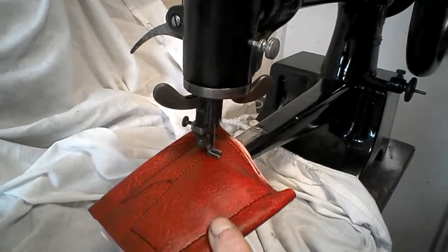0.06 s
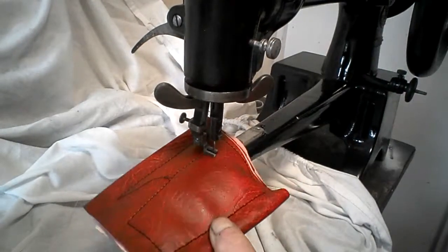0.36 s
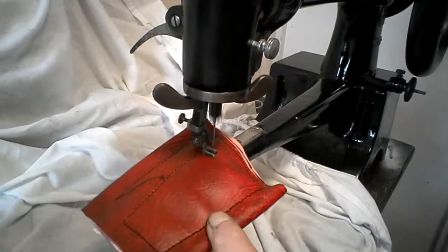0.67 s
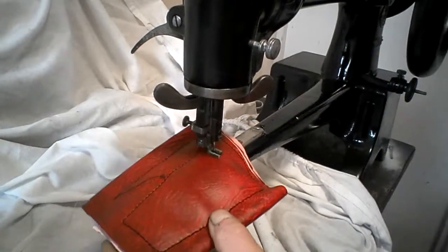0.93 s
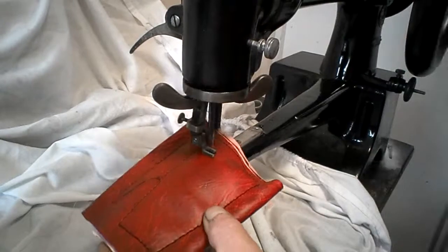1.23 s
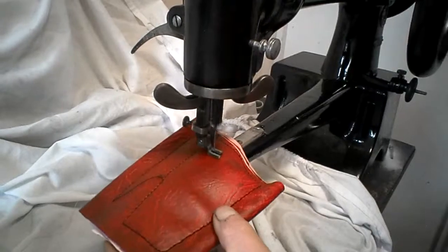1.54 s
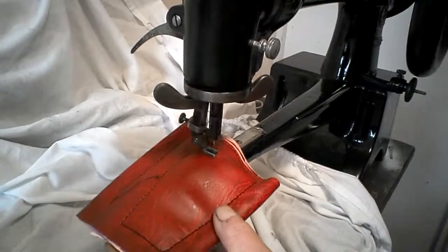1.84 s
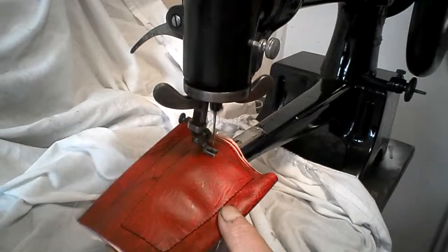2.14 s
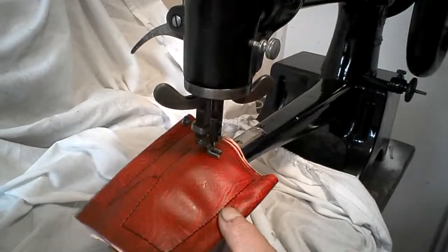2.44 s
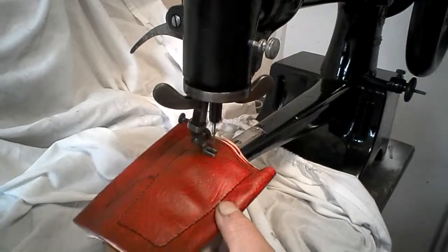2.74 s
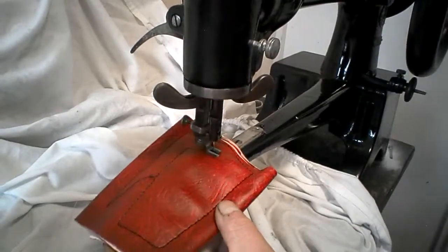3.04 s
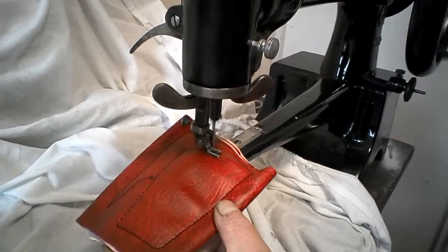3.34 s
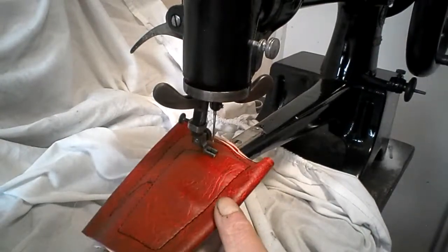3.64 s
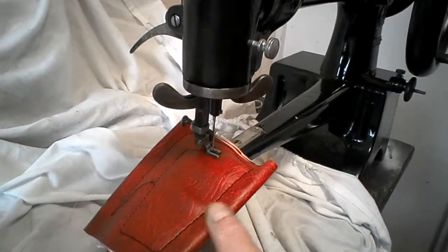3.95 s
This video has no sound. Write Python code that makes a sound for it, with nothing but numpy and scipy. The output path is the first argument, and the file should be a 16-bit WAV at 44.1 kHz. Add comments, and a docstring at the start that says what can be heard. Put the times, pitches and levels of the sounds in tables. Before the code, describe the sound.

A sewing machine clacks steadily through leather, then slows and stops.

```python
"""Leather sewing machine

Close by in a quiet room, the machine makes two stitches a second, then slows and stops.
Each stitch is the same round of steel contacts (needle, feed, shuttle, presser foot), which ring
the iron frame and its table. The drive thumps and rumbles underneath; a faint hiss remains."""
import sys
import numpy as np
from scipy import signal
from scipy.fft import rfft, irfft
from scipy.io import wavfile
from scipy.ndimage import uniform_filter1d

SR = 44100
rng = np.random.default_rng(int(sys.argv[2]) if len(sys.argv) > 2 else 0)


def int16_out(signal):
    """Quantize to a 16-bit WAV file."""
    q = np.round(np.clip(np.atleast_2d(signal).T, -1, 1) * 32767)
    wavfile.write(sys.argv[1], SR, q.astype(np.int16))


N = 176400
T = np.arange(N) / SR
RING_SAMPLES = 17000
AGE = T[:RING_SAMPLES]  # seconds since a blow
BAND_EDGES_HZ = np.geomspace(18, 17000, 33)
BAND_HZ = np.sqrt(BAND_EDGES_HZ[1:] * BAND_EDGES_HZ[:-1])


def amp(db):
    """Turn decibels into a gain."""
    return 10 ** (np.asarray(db) / 20)


def at_hz(table, hz, column=1):
    """Read a table at any pitch, blending between its rows."""
    rows = np.array(table)
    return np.interp(np.log(hz), np.log(rows[:, 0]), rows[:, column])


def level(table):
    """Gain over time from rows of time_s, level_db."""
    return amp(np.interp(T, *np.transpose(table)))


def add(out, start_s, sound):
    """Mix a sound in at its start time."""
    i = int(np.clip(start_s * SR, 0, N - 1))
    out[i:i + len(sound)] += sound[:N - i]


def noise_bands():
    """Separate bands of noise from low to high, all equally strong."""
    filters = [signal.butter(2, edges, "band", fs=SR, output="sos")
               for edges in zip(BAND_EDGES_HZ, BAND_EDGES_HZ[1:])]
    bands = np.array([signal.sosfilt(sos, rng.standard_normal(N + RING_SAMPLES))[RING_SAMPLES:]
                      for sos in filters])
    return bands / bands.std(axis=1, keepdims=True)


def band_gains(tone):
    """Gain of each band. A tone table sets the balance of low and high, not the loudness."""
    gains = amp(at_hz(tone, BAND_HZ)) * np.sqrt(BAND_HZ)
    return gains / np.linalg.norm(gains)


def piece(bands):
    """A random stretch of the bands, as long as one ring."""
    i = rng.integers(N - RING_SAMPLES)
    return bands[:, i:i + RING_SAMPLES]


def steady_noise(tone):
    """Noise with the given tone and a power of 1."""
    hz = np.maximum(np.arange(N // 2 + 1) * SR / N, 1)
    noise = irfft(rfft(rng.standard_normal(N)) * amp(at_hz(tone, hz)), N)
    return noise / noise.std()


# Tone of the hiss both ears share, and of the part that sets them apart: pitch_hz, level_db
HISS_TONE = [(100, 7), (300, -12), (700, -15), (1600, -5), (3000, -6), (4900, 1), (5400, 8), (5900, -1),
             (6350, 6), (7100, 0.5), (7700, -6), (8500, 4), (9300, -4.5), (10300, -8), (11400, 4.5),
             (12500, -1), (14000, -8), (16000, -6)]
HISS_SIDE_TONE = [(60, 2), (150, 3), (500, 4), (1500, -0.5), (4500, 0.5), (8000, 13), (15000, 14)]

def hiss(shared_db=-71, side_db=-78.5):
    """A faint steady hiss, slightly different left and right."""
    shared = amp(shared_db) * steady_noise(HISS_TONE)
    return shared + amp(side_db) * steady_noise(HISS_SIDE_TONE) * [[1], [-1]]


# Shaking of the stand: time_s, level_db
RUMBLE = [(0, -82), (.6, -65), (1.5, -77.5), (2.3, -61), (2.8, -70), (3.4, -61), (3.8, -68), (4, -90)]
# Its tone: pitch_hz, level_db
RUMBLE_TONE = [(20, 9.5), (29, 16), (42, -14), (60, -20.5), (120, -30.5), (400, -78)]

def stand_rumble(bands):
    """The stand shakes with a deep rumble."""
    return level(RUMBLE) * (band_gains(RUMBLE_TONE) @ bands)


# Noise of the sliding parts: time_s, level_db
SLIDING = [(0, -55), (.5, -51.5), (1.5, -52.5), (2.5, -52.5), (2.9, -55), (3.15, -58), (3.4, -62.5),
           (3.6, -75), (3.8, -77.5), (4, -77.5)]
# Its tone: pitch_hz, level_db
SLIDING_TONE = [(60, 0), (110, -1), (160, 4.5), (210, -3.5), (290, 2), (500, -8.5), (900, -10),
                (2500, -23.5), (4800, -15), (7000, -36), (15000, -38)]

def sliding_parts(bands, peak_rattles_per_s=110, rattle_db=5, rattle_s=0.0039):
    """Bearings and slides murmur and rattle while the wheel turns."""
    effort = level(SLIDING)
    chance = peak_rattles_per_s / SR * effort / effort.max()
    clicks = (rng.random(N) < chance) * amp(rattle_db) * rng.random(N)
    bursts = signal.lfilter([1], [1, -np.exp(-1 / (rattle_s * SR))], clicks + 1e-18)
    murmur = band_gains(SLIDING_TONE) @ bands
    steel = (band_gains(SHUTTLE_TONE) @ bands)[::-1]  # backwards, so unrelated to the murmur
    return effort * (murmur + bursts * steel)


# Thumps of the drive: start_s, thud_db, boom_db
THUMPS = [(.002, -49, -53.5), (0.269, -57, -71), (.508, -49.5, -56), (1.007, -49.5, -59),
          (1.164, -55.5, -66), (1.481, -76, -52), (1.673, -53.5, -69), (2.006, -45, -46.5),
          (2.522, -44.5, -49), (2.765, -56.5, -53), (3.139, -51.5, -50.5), (3.323, -48, -51),
          (3.548, -74, -66), (3.689, -66, -66)]
# Tone of the thud: pitch_hz, level_db
THUD_TONE = [(60, -5), (150, 0.5), (215, -4.5), (300, 0.5), (400, 3), (490, -1), (650, -11), (1200, -20.5),
             (4000, -50)]
THUD_RISE_S, THUD_FALL_S = 0.0022, 0.028
BOOM_HZ, BOOM_PEAK_S, OVERTONE_HZ, OVERTONE_DB = 77, 0.067, 155.2, -14

def drive_thumps(bands):
    """The drive thuds dully; after each thud, two low notes of the room swell and sink."""
    thud_shape = 2 * (1 - np.exp(-AGE / THUD_RISE_S)) * np.exp(-AGE / THUD_FALL_S)
    notes = np.sin(2 * np.pi * BOOM_HZ * AGE) + amp(OVERTONE_DB) * np.sin(2 * np.pi * OVERTONE_HZ * AGE)
    boom = (AGE / BOOM_PEAK_S * np.exp(1 - AGE / BOOM_PEAK_S)) ** 2 * notes
    out = np.zeros(N)
    for start_s, thud_db, boom_db in THUMPS:
        thud = thud_shape * (band_gains(THUD_TONE) @ piece(bands))
        add(out, start_s, amp(thud_db) * thud + amp(boom_db) * boom)
    return out


# The machine's blurred ring after a blow: pitch_hz, level_db, fade_s (time to drop 60 dB), build_s
TAIL = [(150, -11.5, 0.44, 0.042), (495, -12.5, 0.28, 0.02), (1110, -9.5, .26, 0.0015),
        (2450, -9.5, 0.33, 0.0014), (4660, -11.5, 0.23, 0.0012), (8100, -10.5, 0.28, 0.0025),
        (15000, -13, 0.14, .001)]
# Clear notes of the frame and table: pitch_hz, level_db, fade_s
FRAME_NOTES = [(257.5, -12, 0.52), (395.7, -13, 0.21), (461, -17, 0.51), (501.5, -9, 0.23),
               (625, -23.5, 0.22), (700, -17, 0.43), (909, -15.5, 0.34), (1000, -17.5, 0.23),
               (1148, -14, 0.11), (1364, -16, 0.061), (1894, -8, 0.11), (2070, -7, 0.13),
               (2420, -15.5, 0.26), (2500, -13, 0.17), (2790, -9.5, 0.13), (3040, -18, 0.16),
               (3840, -23, 0.061), (3990, -19, 0.066), (4630, -7.5, 0.16), (4770, -10, 0.27),
               (5260, -6, 0.09)]
SAME_SHARE, SAME_ABOVE_HZ = 0.92, 1500  # high noise mostly repeats from blow to blow; low noise varies
NOTE_SPREAD_DB, NOTE_WANDER = 5.5, 0.0081  # the notes shift as the parts move
LONGEST_RING_CYCLES = 750

def steel_blows(bands, hits, tone, gain_db, rise_s, crack_s, tail_db, notes_db):
    """Steel hits steel: a sharp crack, a blurred ringing tail and the frame's clear notes."""
    band_db, fade_s, build_s = (at_hz(TAIL, BAND_HZ, column)[:, None] for column in (1, 2, 3))
    crack = (1 - np.exp(-AGE / rise_s)) * np.exp(-AGE / crack_s) * (1 - np.exp(-crack_s / build_s))
    tail = amp(band_db + tail_db - 60 * AGE / fade_s) * (1 - np.exp(-AGE / build_s))
    shape = band_gains(tone)[:, None] * np.hypot(crack, tail)
    share = SAME_SHARE / (1 + (SAME_ABOVE_HZ / BAND_HZ[:, None]) ** 2)
    same_noise = (np.sqrt(share) * shape * piece(bands)).sum(axis=0)
    fresh_shape = np.sqrt(1 - share) * shape

    hz, note_db, note_fade_s = np.transpose(FRAME_NOTES)[:, :, None]
    note_fade_s = np.minimum(note_fade_s, LONGEST_RING_CYCLES / hz)
    note_shapes = amp(note_db + notes_db + at_hz(tone, hz) - 60 * AGE / note_fade_s)
    note_shapes *= 1 - np.exp(-AGE / at_hz(TAIL, hz, column=3))
    out = np.zeros(N)
    for start_s, strength_db in hits:
        fresh_noise = (fresh_shape * piece(bands)).sum(axis=0)
        shifted_hz = hz * (1 + NOTE_WANDER * rng.standard_normal(hz.shape))
        waves = np.sin(2 * np.pi * (shifted_hz * AGE + rng.random(hz.shape)))
        note_gains = amp(NOTE_SPREAD_DB * (2 * rng.random(len(hz)) - 1.5))
        notes = note_gains @ (note_shapes * waves)
        add(out, start_s, amp(strength_db + gain_db) * (same_noise + fresh_noise + notes))
    return out


# Pings of the spring: start_s, strength_db
PINGS = [(0.014, -37.5), (0.488, -33), (0.535, -37), (0.987, -27), (1.032, -36), (1.489, -30.5),
         (1.533, -37.5), (1.9818, -35), (2.0294, -46), (2.551, -36), (3.0676, -47), (3.162, -37.5),
         (3.46, -47.5)]
# Their tone: pitch_hz, level_db
PING_TONE = [(150, -22.5), (2500, -13), (4000, -4.5), (4900, 10), (5900, -0.5), (7200, 1), (9000, -21.5),
             (11000, -34), (13000, -17), (16000, -29)]

def thread_spring(bands):
    """The thread spring gives short, bright pings."""
    return steel_blows(bands, PINGS, PING_TONE, gain_db=-2,
                       rise_s=0.00043, crack_s=0.002, tail_db=-13.5, notes_db=-18.5)


# Ticks of the links: start_s, strength_db
TICKS = [(0.0405, -36), (0.185, -41), (0.5595, -37), (0.6962, -38.5), (1.057, -37.5), (1.1977, -45),
         (1.5595, -37.5), (1.6934, -37), (2.0578, -37), (2.1994, -40.5), (2.579, -37), (2.7303, -39),
         (3.2083, -39)]
# Their tone: pitch_hz, level_db
TICK_TONE = [(150, -1), (900, -8.5), (2000, 0.5), (3000, -2.5), (4600, 5), (6000, -20), (9000, -21),
             (15000, -22.5)]

def linkage(bands):
    """The links between the moving parts tick lightly."""
    return steel_blows(bands, TICKS, TICK_TONE, gain_db=-1.5,
                       rise_s=0.0002, crack_s=0.0037, tail_db=-9, notes_db=-11)


# Landings of the foot: start_s, strength_db
LANDINGS = [(0.0831, -27.5), (0.5996, -26.5), (1.0985, -26.5), (1.5991, -24.5), (2.1002, -27.5),
            (2.6226, -28), (3.2791, -36)]
# Their tone: pitch_hz, level_db
LANDING_TONE = [(150, -8), (520, 13), (1250, -6), (1900, 0), (3000, -3.5), (4800, 7), (7000, -12),
                (10000, -16.5), (15000, -25)]

def foot_down(bands):
    """The presser foot, which holds the leather, comes down."""
    return steel_blows(bands, LANDINGS, LANDING_TONE, gain_db=-6.5,
                       rise_s=0.00028, crack_s=0.0079, tail_db=2, notes_db=-8)


# Answers of the table: start_s, level_db
TABLE_NOTES = [(0.084, -50), (0.41, -40.5), (.602, -46), (.907, -43), (1.101, -44), (1.409, -40),
               (1.601, -43), (1.901, -40.5), (2.102, -50), (2.419, -45), (2.986, -45.5)]
# Their tone: pitch_hz, level_db
TABLE_TONE = [(150, -14), (330, -24.5), (420, -17.5), (510, 12), (610, -17), (710, -1), (900, -2.5),
              (2000, -34)]

def wooden_table(bands, peak_s=0.015):
    """The wooden table answers the foot's blows with a short, late, hollow note."""
    swell = (AGE / peak_s * np.exp(1 - AGE / peak_s)) ** 3
    out = np.zeros(N)
    for start_s, level_db in TABLE_NOTES:
        add(out, start_s, amp(level_db) * swell * (band_gains(TABLE_TONE) @ piece(bands)))
    return out


# Strokes of the needle: start_s, strength_db
STROKES = [(0.2436, -33), (0.7472, -33), (1.2488, -31.5), (1.7428, -30.5), (2.2514, -32.5), (2.7894, -33)]
# Their tone: pitch_hz, level_db
STROKE_TONE = [(150, -42), (700, -42.5), (1400, -25), (2000, 9.5), (2900, -1.5), (4200, 13), (5400, 10),
               (7000, -14.5), (15000, -16)]

def needle_strike(bands):
    """The needle meets the leather with a bright click."""
    return steel_blows(bands, STROKES, STROKE_TONE, gain_db=-2,
                       rise_s=0.0012, crack_s=0.0031, tail_db=2.5, notes_db=-22.5)


# Tone of the needle rubbing: pitch_hz, level_db
RUB_TONE = [(1500, -20.5), (3000, 10.5), (4300, -4.5), (5600, 5.5), (7000, 2.5), (9000, 4), (12000, -2),
            (15000, -9)]

def needle_rub(bands, delay_s=0.026, width_s=0.011, gain_db=-24.5, rough_db=5.5):
    """The needle rubs through the leather with a short, grainy rasp on each stroke."""
    swell = np.exp(-0.5 * ((AGE - delay_s) / width_s) ** 2)
    out = np.zeros(N)
    for start_s, strength_db in STROKES:
        grain = uniform_filter1d(rng.standard_normal(RING_SAMPLES), size=100)
        rough_gain = amp(strength_db + gain_db + rough_db * grain / grain.std())
        add(out, start_s, rough_gain * swell * (band_gains(RUB_TONE) @ piece(bands)))
    return out


# Snaps of the point: start_s, strength_db
SNAPS = [(0.258, -44), (0.765, -43), (1.266, -41), (1.759, -46), (2.269, -42), (2.809, -46)]
# Their tone: pitch_hz, level_db
SNAP_TONE = [(150, -25), (3000, -10), (5000, 4), (8500, 11), (11000, -16), (15000, 0)]

def needle_snap(bands):
    """The point breaks through the leather with a thin snap."""
    return steel_blows(bands, SNAPS, SNAP_TONE, gain_db=-2.5,
                       rise_s=0.0008, crack_s=0.0041, tail_db=-2, notes_db=-25)


# Squeaks of needle and thread: peak_s, pitch_hz, level_db
SQUEAKS = [(.262, 9950, -56), (.277, 8400, -57), (.287, 10000, -56), (.289, 11100, -56),
           (1.224, 4100, -47.5), (1.240, 4020, -57), (1.262, 4130, -55), (2.763, 4150, -52.5),
           (2.815, 8300, -57)]

def squeaks(width_s=0.0025, waver_share=0.0095):
    """Needle and thread rub and give tiny, unsteady whistles."""
    out = np.zeros(N)
    for peak_s, pitch_hz, level_db in SQUEAKS:
        waver = uniform_filter1d(rng.standard_normal(N), size=60)
        phase = 2 * np.pi * np.cumsum(pitch_hz * (1 + waver_share * waver / waver.std())) / SR
        swell = np.exp(-0.5 * ((T - peak_s) / width_s) ** 2)
        out += amp(level_db) * swell * np.sqrt(2) * np.sin(phase)
    return out


# Clacks of the lever: start_s, strength_db
CLACKS = [(0.298, -22), (0.803, -19.5), (1.3044, -19.5), (1.7954, -19), (2.3074, -17.5), (2.8507, -22.5)]
# Their tone: pitch_hz, level_db
CLACK_TONE = [(150, -7), (500, 6), (1300, -5), (2000, -4.5), (3000, -8), (4100, 6), (5300, -0.5),
              (7000, -34.5), (10000, -26), (15000, -26.5)]

def feed_lever(bands):
    """The lever that moves the leather along hits its stop."""
    return steel_blows(bands, CLACKS, CLACK_TONE, gain_db=-3.5,
                       rise_s=0.0018, crack_s=0.0037, tail_db=-1, notes_db=-12)


# Lifts of the foot: start_s, strength_db
LIFTS = [(0.407, -23), (0.9066, -22.5), (1.4079, -22.5), (1.8999, -25), (2.4176, -24.5), (2.9818, -25.5)]
# Their tone: pitch_hz, level_db
LIFT_TONE = [(150, 8), (500, 8), (900, 1), (2000, 1), (2900, -4.5), (4700, 5.5), (5600, -1.5), (7000, -9.5),
             (15000, -25.5)]

def foot_up(bands):
    """The presser foot lifts with a clunk."""
    return steel_blows(bands, LIFTS, LIFT_TONE, gain_db=-11,
                       rise_s=0.001, crack_s=0.012, tail_db=-2.5, notes_db=-14)


# Knocks in the shuttle drive: start_s, strength_db
KNOCKS = [(0.427, -22.5), (0.494, -29), (0.927, -20.5), (0.987, -24.5), (1.426, -24), (1.494, -23.5),
          (1.921, -21), (2.001, -25.5), (2.438, -19), (2.831, -27.5), (3.006, -20), (3.083, -21.5),
          (3.514, -40)]
# Their tone: pitch_hz, level_db
KNOCK_TONE = [(150, 6), (480, 9.5), (800, 1), (1250, 5), (2200, -1), (3300, -6), (4700, 3), (7000, -25),
              (15000, -33)]

def shuttle_knock(bands):
    """Slack in the shuttle drive lets its parts knock together."""
    return steel_blows(bands, KNOCKS, KNOCK_TONE, gain_db=-4,
                       rise_s=0.00031, crack_s=0.0027, tail_db=-5.5, notes_db=-17.5)


# Swings of the shuttle: start_s, strength_db
SWINGS = [(.466, -37.5), (0.965, -39), (1.369, -38), (1.466, -34.5), (1.959, -38.5), (2.478, -37),
          (2.929, -43)]
# Their tone, shared by the rattle of the sliding parts: pitch_hz, level_db
SHUTTLE_TONE = [(150, -10), (900, 11), (2000, 1.5), (3000, -3.5), (4700, 7), (7000, -9.5), (15000, -24)]

def shuttle_swing(bands):
    """The shuttle, which carries the lower thread, swings over with a soft clink."""
    return steel_blows(bands, SWINGS, SHUTTLE_TONE, gain_db=-5,
                       rise_s=0.0024, crack_s=0.0073, tail_db=-10, notes_db=-2)


# Echoes from the machine's arm and bed: delay_s, level_db
ECHOES = [(.00068, -39.5), (.00161, -18), (.00305, -23), (.0047, -33)]

def with_echoes(sound):
    """Nearby surfaces add very quick copies that colour the clatter."""
    return sound + sum(amp(db) * np.interp(T - delay_s, T, sound, left=0) for delay_s, db in ECHOES)


def scene():
    """The machine sits in the centre, with the hiss around it."""
    bands = noise_bands()
    clatter = (needle_strike(bands) + feed_lever(bands) + foot_up(bands) + shuttle_knock(bands)
               + foot_down(bands) + linkage(bands) + shuttle_swing(bands) + needle_snap(bands)
               + thread_spring(bands) + needle_rub(bands))
    return (with_echoes(clatter) + wooden_table(bands) + squeaks()
            + stand_rumble(bands) + drive_thumps(bands) + sliding_parts(bands) + hiss())


def record(dry):
    """The very highest treble is cut off steeply."""
    cutoff_hz = 16100
    return signal.sosfilt(signal.ellip(10, 0.2, 70, cutoff_hz, fs=SR, output="sos"), dry)


dry = scene()
out = record(dry)
int16_out(out)
```